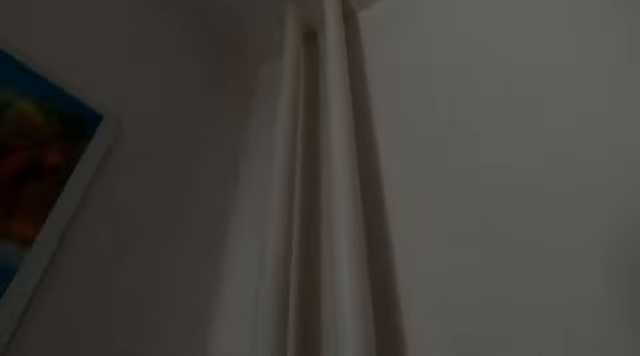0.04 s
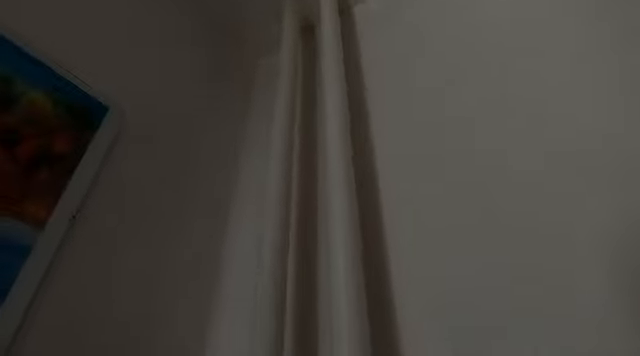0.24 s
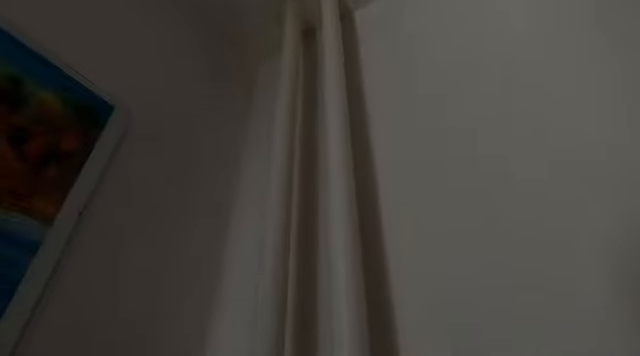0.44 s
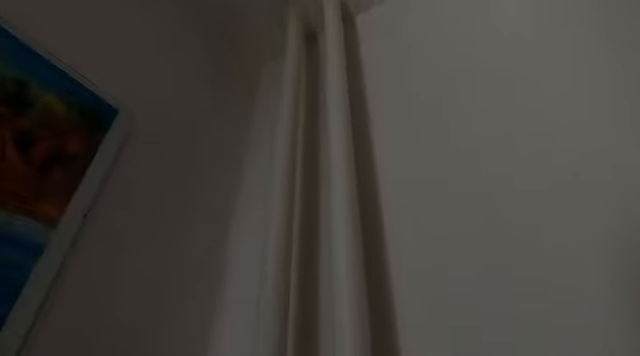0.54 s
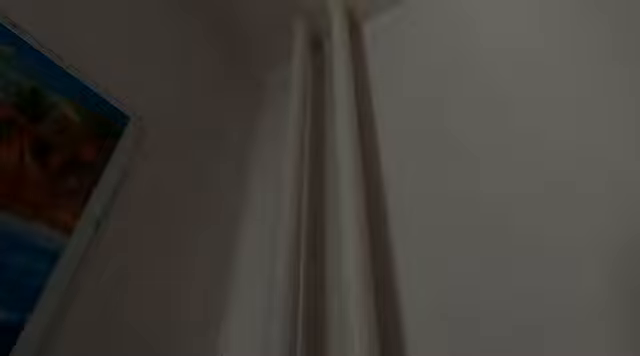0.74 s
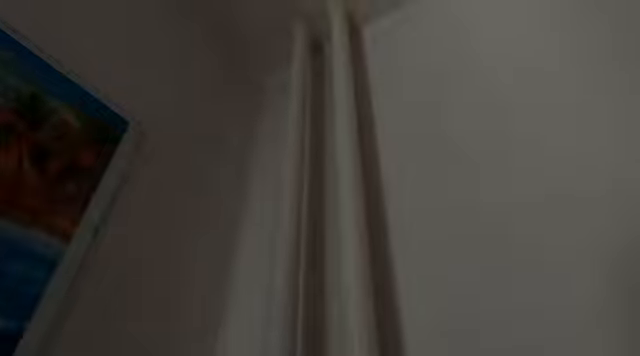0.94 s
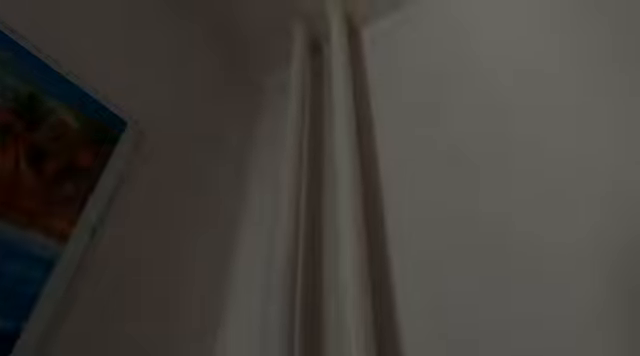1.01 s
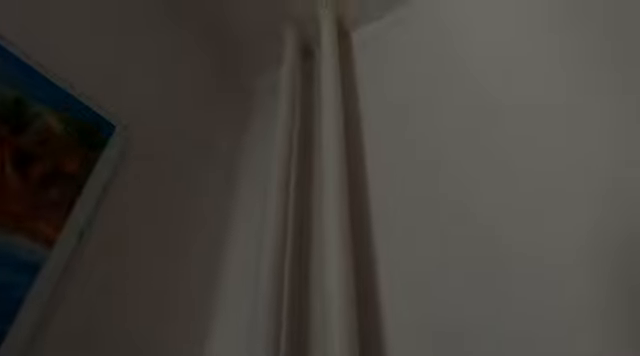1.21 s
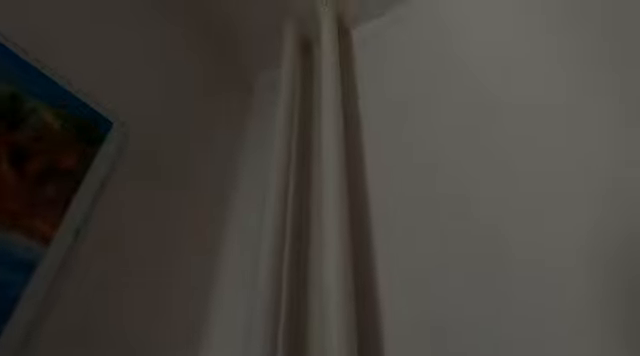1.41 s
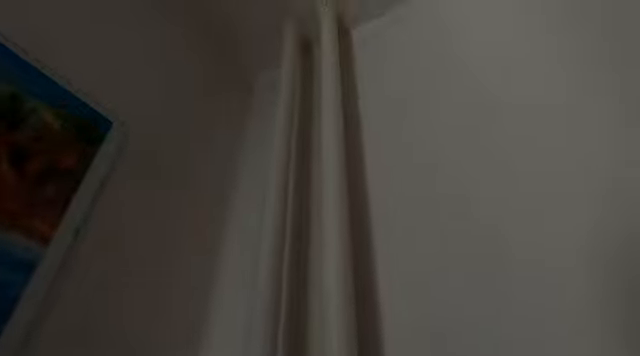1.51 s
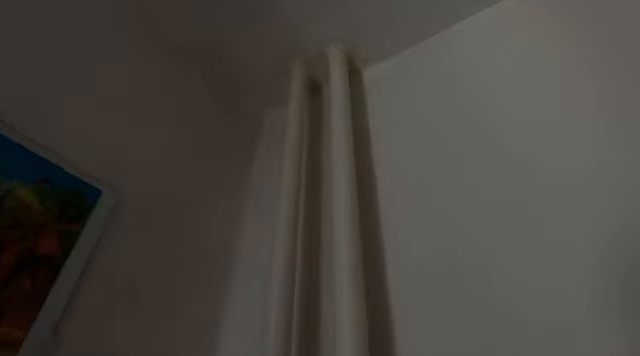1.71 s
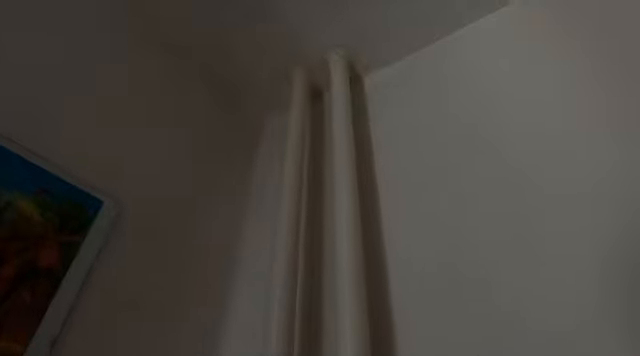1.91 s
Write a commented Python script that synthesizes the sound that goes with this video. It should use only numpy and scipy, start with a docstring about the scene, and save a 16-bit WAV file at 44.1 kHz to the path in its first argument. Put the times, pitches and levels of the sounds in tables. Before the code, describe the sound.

A heating pipe bangs in a quiet bedroom: a fading tail at the start, then a sharp crack with thin steel ring and low boom at 1 second. Faint hiss and low handling thumps pass by 0.4 seconds. Louder dull knocks and rubbing crowd the right microphone from 0.7 to 0.95, returning at 1.3. A faint drone lies underneath, and deep rumble swells before everything stops at 1.7.

```python
"""In a quiet bedroom a heating pipe slips in its bracket and bangs: a sharp crack, a thin steel ring
and a low boom in the wall. The tail of an earlier bang is heard at the very start.
Dull knocks and soft rubbing crowd the right microphone, probably from a hand on the camera, whose
movement also rumbles. Under it lie the room's low drone and, early on, a faint hiss.
All falls silent shortly before the end."""
import sys
import numpy as np
from scipy import signal
from scipy.fft import rfft, irfft, next_fast_len
from scipy.io import wavfile
from scipy.ndimage import uniform_filter1d

SR = 44100
rng = np.random.default_rng(int(sys.argv[2]) if len(sys.argv) > 2 else 0)


def to_wav(sig):
    """Store sig (one row per channel, or 1-D mono) as 16-bit WAV at the path in sys.argv[1].

    Samples outside -1..1 are clipped; the rate is SR.
    """
    pcm = np.clip(np.atleast_2d(sig), -1, 1) * 32767
    pcm = np.round(pcm).astype(np.int16)
    wavfile.write(sys.argv[1], SR, pcm.T)  # frames by channels


N = 85995
T = np.arange(N) / SR


def amp(db):
    """Turn decibels into a gain."""
    return 10 ** (np.asarray(db) / 20)


def unit(x):
    """Scale a signal to an average strength (rms) of 1."""
    return x / np.sqrt(np.mean(x ** 2) + 1e-20)


def along(points, hz):
    """Read between (frequency, value) points on a log frequency axis."""
    f, v = np.transpose(points)
    return np.interp(np.log(hz + 1), np.log(f + 1), v)


def filtered(x, response):
    """Scale each frequency in x by the gain response(hz)."""
    size = next_fast_len(N + 8192)
    return irfft(rfft(x, size) * response(np.fft.rfftfreq(size, 1 / SR)), size)[..., :N]


def noise(colour, alike):
    """Stereo noise of rms about 1; colour sets its bass-to-treble balance, alike=1 makes it mono."""
    mid, side = unit(filtered(rng.standard_normal((2, N)), lambda hz: amp(along(colour, hz))))
    turn = np.arccos(np.clip(alike, -1, 1)) / 2
    return np.cos(turn) * mid + np.sin(turn) * np.array([side, -side])


def wobble(speed_hz):
    """A random wiggle of rms 1, mostly slower than speed_hz."""
    return unit(filtered(rng.standard_normal(N), lambda hz: np.exp(-(hz / speed_hz) ** 2)))


def left(db):
    """Gains for both channels, the left one changed by db."""
    return np.array([[amp(db)], [1]])


def fade(s, rise, t60):
    """Rise smoothly from time s to a peak of 1, then die away by 60 dB every t60 seconds."""
    t = np.maximum(T - s, 0)
    shape = (1 - np.exp(-(t / rise) ** 2)) * np.exp(-np.log(1000) * t / t60)
    return shape / shape.max()


def ring(s, hz, rise, t60, sag=0, sag_s=0.0082):
    """A struck tone that dies away; its pitch drops by the share sag."""
    t = np.maximum(T - s, 0)
    cycles = hz * (t - sag * (t - sag_s * (1 - np.exp(-t / sag_s))))
    return fade(s, rise, t60) * np.sin(2 * np.pi * cycles)


# colour of the still room (f/Hz, level/dB)
QUIET_COLOUR = [(24, -17), (50, -1.5), (100, -4.5), (195, -7), (280, -13), (390, -7.5), (500, -15),
                (750, -19.5), (1120, -18), (1400, -22), (2200, -24.5), (4500, -32.5), (8000, -37.5),
                (10400, -55.5), (13500, -77)]
# colour of the room's low resonances (f/Hz, level/dB)
DRONE_COLOUR = [(60, -33), (125, -13.5), (150, 2), (195, 1.5), (225, -5.5), (300, -19.5), (800, -73)]


def room_tone():
    """The quiet room and its steady low drone."""
    return amp(-69) * noise(QUIET_COLOUR, alike=0.11) + amp(-68) * noise(DRONE_COLOUR, alike=0.76)


# how the hiss fades (t/s, level/dB)
HISS_LEVEL = [(0.0, -71.5), (0.03, -71.5), (0.201, -71.5), (0.338, -85), (0.451, -100)]
# colour of the hiss (f/Hz, level/dB)
HISS_COLOUR = [(300, -15), (1000, -7), (2600, -5.5), (4200, -0.5), (6500, -7.5), (8600, -6.5), (10000, -30),
               (12000, -69.5)]


def hiss():
    """A faint hiss that dies away early on."""
    level_db = np.interp(T, *np.transpose(HISS_LEVEL), right=-120)
    return amp(level_db) * left(db=4.5) * noise(HISS_COLOUR, alike=0.37)


# how the rumble and the sway swell (t/s, level/dB)
RUMBLE_LEVEL = [(0, -74), (.08, -53.5), (.205, -59), (.241, -40.5), (.31, -38.5), (.355, -43.5),
                (.395, -58), (.5, -59.5), (.57, -59.5), (.65, -54.5), (.7, -50), (.75, -64.5), (1.01, -70),
                (1.111, -52), (1.28, -68.5), (1.38, -57), (1.52, -73.5), (1.68, -73)]
SWAY_LEVEL = [(1.55, -71), (1.59, -39), (1.68, -33)]
# their colours (f/Hz, level/dB)
RUMBLE_COLOUR = [(5, -14.5), (18, 8), (30, -6), (55, -4), (80, -22.5), (130, -25.5), (250, -53), (600, -80),
                 (2000, -85)]
SWAY_COLOUR = [(5, -2), (15, 3), (35, -13), (55, -21.5), (80, -32.5), (130, -49.5), (300, -78),
               (2000, -130)]


def rumble():
    """Moving the microphones makes very low swells, and a deep sway on the right near the end."""
    swells = amp(np.interp(T, *np.transpose(RUMBLE_LEVEL))) * noise(RUMBLE_COLOUR, alike=0.9)
    sway = amp(np.interp(T, *np.transpose(SWAY_LEVEL))) * noise(SWAY_COLOUR, alike=0.95)
    return swells + left(db=-18.5) * sway


# soft bumps of the hand (t/s, f/Hz, level/dB)
THUMPS = [(0.217, 70.4, -46.5), (0.247, 74.4, -42.5), (.274, 100, -45.5), (.298, 82, -42.5),
          (.328, 83, -46), (0.361, 103, -54)]


def thumps():
    """The hand shifts its grip in a few soft, low thumps."""
    return sum(amp(db) * ring(s, hz, rise=0.004, t60=0.05) for s, hz, db in THUMPS)


def tick():
    """One faint, high tick near the end."""
    return amp(-64) * ring(s=1.67, hz=9500, rise=0.00017, t60=0.006)


# the tones in a squeak (multiple of the pitch, level/dB)
SQUEAK_TONES = [(1, 4), (2, -26), (5, -30)]


def squeak(pitch_hz=447, wander=0.031):
    """Rubbed surfaces stick and slip in quick turns, making an unsteady tone."""
    hz = pitch_hz * (1 + wander * wobble(speed_hz=70))
    phase = 2 * np.pi * np.cumsum(hz) / SR
    return unit(sum(amp(db) * np.sin(round(k) * phase) for k, db in SQUEAK_TONES))


# strokes of the hand (peak t/s, rise/s, fall/s, level/dB, rustle's left minus right/dB,
# squeak/dB and groan/dB relative to the level)
STROKES = [(0.23, 0.02, 0.014, -80, 0, 3, 20), (.555, 0.038, 0.033, -65.5, -5.5, 11, -25),
           (0.687, .012, 0.0073, -68, -4.5, 11, 7.5), (.717, .006, .028, -63, -3, -20, -10),
           (.785, 0.03, 0.035, -70, -2.5, 11, 18.5), (0.866, 0.052, .032, -62, -2.5, 2, 12),
           (1.339, 0.026, 0.025, -55.5, -2, -28, -8.5), (1.462, 0.097, 0.079, -63, -2.5, -15.5, -6),
           (1.686, .014, .025, -67, -7.5, -9.5, -1)]
# colours of the rustle, the low groan and the bright scrape (f/Hz, level/dB)
RUSTLE_COLOUR = [(150, -7), (450, -1), (680, -10.5), (1100, 3.5), (1650, -11), (2150, -5), (2550, -12.5),
                 (3000, -12), (4800, -14.5), (8300, -28.5), (9400, -36.5), (10300, -58), (12000, -72.5)]
GROAN_COLOUR = [(60, -35), (120, -18), (150, 1.5), (195, 0), (240, -15), (330, -13), (900, -77.5)]
SCRAPE_COLOUR = [(1000, -27.5), (3500, -6.5), (5200, 2), (6500, -23), (9000, -31), (11000, -53.5)]


def rubbing():
    """Strokes swell and fade with a grainy rustle; some squeak or groan, and one scrapes."""
    grain = amp(1.8 * unit(uniform_filter1d(rng.standard_normal(N), size=130)))
    rustle = unit(grain * noise(RUSTLE_COLOUR, alike=0.17))
    squeal = squeak()
    groan = noise(GROAN_COLOUR, alike=0.9)
    scrape_shape = np.exp(-((T - 0.711) / 0.0016) ** 2)
    out = amp(-55) * scrape_shape * left(db=-15) * noise(SCRAPE_COLOUR, alike=0.4)
    lopsided = 12  # squeak and groan lean this many times more dB to one side than the rustle
    for s, rise, fall, db, left_db, squeak_db, groan_db in STROKES:
        from_peak = (T - s) / np.where(T < s, rise, fall)
        swell = np.exp(-from_peak ** 2)
        grip = np.exp(-from_peak ** 4)  # it squeaks only while pressed hard
        voice = amp(squeak_db) * grip * squeal + amp(groan_db) * swell * groan
        out += amp(db) * (left(left_db) * swell * rustle + left(lopsided * left_db) * voice)
    return out


# colour of the dry slide (f/Hz, level/dB)
RASP_COLOUR = [(300, -44), (650, -18.5), (920, -4), (1400, 0), (1800, -5), (2700, -14.5), (3800, -37),
               (4700, -14), (6000, -19.5), (8800, -23), (10000, -53.5)]


def rasp(start_s=1.2904, end_s=1.34):
    """A short slide starts suddenly and grows until the last knock."""
    level_db = np.interp(T, [start_s, end_s], [-65, -51.5], left=-140, right=-140)
    swell = uniform_filter1d(amp(level_db), size=130)
    return swell * left(db=-8.5) * noise(RASP_COLOUR, alike=0.87)


# dull blows (t/s, f/Hz, level/dB, rise/s, t60/s, click/dB and thud/dB relative to the level)
KNOCKS = [(.6936, 491, -27, .001, 0.025, -27, -17.5), (0.6926, 872, -36, 0.0013, 0.019, -45, -19),
          (.694, 640, -37.5, .001, 0.044, -40, -19), (0.701, 219, -35, 0.0054, .07, -27, -16.5),
          (.734, 430, -43, .004, .05, -22, -17), (.756, 425, -47, .004, .045, -32.5, -17),
          (.783, 922, -52, 0.0026, 0.039, -15, -3.5), (0.8282, 472.4, -37, 0.0088, 0.03, -21.5, -21),
          (.8277, 1205, -43, .0025, 0.0056, -9.5, -20), (0.8798, 470, -40, 0.0028, 0.054, -18.5, -23),
          (0.9366, 898, -33.5, 0.0023, 0.0098, -58, -16), (1.3393, 343, -26, 0.0034, .052, -19, -21.5),
          (1.3404, 657, -42.5, 0.00075, 0.029, -28.5, -13.5),
          (1.3395, 904, -49.5, 0.0024, 0.045, -25.5, -16)]
# colours of a blow's thud and click (f/Hz, level/dB)
THUD_COLOUR = [(60, -1.5), (200, 14.5), (450, 8), (650, 8.5), (1000, 4.5), (1350, -28), (3000, -36.5),
               (9000, -61)]
CLICK_COLOUR = [(200, -12.5), (700, 18), (1150, 6.5), (1800, -4), (5000, -10.5), (8500, -14), (10500, -51)]
# tones of the knocked casing (f/Hz, level/dB relative to the knock, t60/s)
CASING_TONES = [(159, -32.5, .25), (407, -24.5, 0.12)]
KNOCK_LEFT_DB = -27.5


def knocks():
    """Soft blows by the right microphone: a hollow tone, a thud, a click and the casing's ring."""
    out = np.zeros((2, N))
    thud_noise, click_noise = noise(THUD_COLOUR, alike=0.58), noise(CLICK_COLOUR, alike=0.44)
    for s, hz, db, rise, t60, click_db, thud_db in KNOCKS:
        tone = ring(s, hz, rise, t60, sag=0.17)
        thud = amp(thud_db) * fade(s, rise=0.0036, t60=0.059) * thud_noise
        casing = sum(amp(level) * ring(s, f, 0.004, decay) for f, level, decay in CASING_TONES)
        click = amp(click_db) * fade(s, rise=0.00046, t60=0.022) * click_noise
        out += amp(db) * (left(KNOCK_LEFT_DB) * (tone + thud + casing) + left(db=-3.5) * click)
    return out


# taps just after the first knock (t/s, f/Hz, level/dB)
TAPS = [(.7135, 792, -38), (.7178, 938, -35), (.7275, 878, -38.5), (.7405, 867, -39), (.7515, 870, -42.5)]


def chatter():
    """Quick, uneven taps that die away, each a hollow tone and a thud."""
    out = np.zeros((2, N))
    thud_noise = noise(THUD_COLOUR, alike=0.75)
    for s, hz, db in TAPS:
        tone = ring(s, hz, rise=0.0021, t60=0.046)
        thud = amp(-11) * fade(s, rise=0.002, t60=0.035) * thud_noise
        out += amp(db) * (tone + thud)
    return left(KNOCK_LEFT_DB) * out


# how long sound lingers in the bedroom (f/Hz, t60/s)
ECHO_TIMES = [(150, 0.31), (400, .3), (1000, 0.26), (2800, 0.27), (8000, .19)]


def room_echo(x):
    """The bedroom's echo of a mono sound, dying faster in the treble."""
    hz, t, spectrum = signal.stft(rng.standard_normal((2, SR // 2)), SR, nperseg=256)
    decay = np.exp(-np.log(1000) * t / along(ECHO_TIMES, hz)[:, None])
    _, tail = signal.istft(spectrum * decay, SR, nperseg=256)
    tail = tail + tail[::-1] / 3  # each side hears some of the other
    return signal.fftconvolve(x[None], tail / np.linalg.norm(tail[0]), axes=1)[:, :N]


def snap(s, colour, size=2048):
    """One sharp pulse of the given colour at time s, with a peak of 1."""
    cepstrum = irfft(np.log(amp(along(colour, np.fft.rfftfreq(size, 1 / SR)))))
    # folding the second half onto the first packs the energy at the pulse's start
    cepstrum[1:size // 2] *= 2
    cepstrum[size // 2:] = 0
    pulse = irfft(np.exp(rfft(cepstrum)))
    return np.pad(pulse / abs(pulse).max(), (round(s * SR), N))[:N]


# tones of the pipe's bracket (f/Hz, relative level/dB, t60/s)
BRACKET_TONES = [(301.4, -9, .01), (1064, 4.5, 0.015), (1367, 0.5, 0.0074), (1980, -6, 0.025),
                 (3620, -5, .013), (4150, -7, .012), (5380, -13, 0.01)]


def bracket_clack():
    """The jolted bracket rings so briefly that it sounds like a clack."""
    return sum(amp(db) * ring(0.0012, hz, rise=0.00025, t60=t60) for hz, db, t60 in BRACKET_TONES)


# tones of the steel pipe (f/Hz, relative level/dB, t60/s)
STEEL_TONES = [(1027, -20, 0.33), (1340, -14.5, .22), (1564, -16, .15), (8300, -28, 0.31),
               (8670, -15.5, 0.11), (8800, -19, .13)]


def steel_ring(roughness=1.1):
    """The steel rings thinly, each tone roughened by a fast random flutter."""
    out = np.zeros(N)
    for hz, db, t60 in STEEL_TONES:
        flutter = 1 + roughness * wobble(speed_hz=130)
        out += amp(db) * ring(0, hz, rise=0.0005, t60=t60) * flutter
    return out


# pipe bangs, the first just before the start (t/s, level/dB)
BANGS = [(-.03, -45), (0.9694, -45)]
# colour of the crack and the bracket's buzz (f/Hz, level/dB)
CRACK_COLOUR = [(100, -22.5), (280, 4), (750, 0), (1100, -1), (1500, -2.5), (2100, -4.5), (3200, -9),
                (4500, -12), (5600, -15.5), (7000, -17.5), (8900, -11), (10000, -22), (12000, -36.5)]


def pipe():
    """The pipe slips in its bracket: a crack, a clack and a buzz, the steel's ring, the wall's boom."""
    out = np.zeros((2, N))
    for s, db in BANGS:
        spike = amp(6.5) * snap(0.0016, CRACK_COLOUR)
        crack = spike + amp(-0.5) * fade(0, rise=0.0018, t60=0.0081) * noise(CRACK_COLOUR, alike=0.6)
        buzz = amp(-14) * fade(0, rise=0.003, t60=0.06) * noise(CRACK_COLOUR, alike=0.39)
        boom = amp(1) * ring(s=0.0115, hz=206, rise=0.0077, t60=0.055)
        bang = crack + bracket_clack() + buzz + amp(-2) * steel_ring() + boom + amp(6) * room_echo(spike)
        since_bang = T - round(s * SR) / SR
        placed = np.array([np.interp(since_bang, T, side, left=0, right=0) for side in bang])
        out += amp(db) * left(db=1) * placed
    return out


def scene():
    """The pipe, the sounds of the hand and the room together."""
    events = pipe() + knocks() + chatter() + rubbing() + rasp() + tick()
    return events + hiss() + thumps() + rumble() + room_tone()


def record(dry, end_s=1.722, top_hz=11700):
    """The sound stops short at end_s, and the treble above top_hz is cut away."""
    gate = np.clip((end_s - T) / 0.003, 0, 1)
    return filtered(dry * gate, lambda hz: 1 / np.sqrt(1 + (hz / top_hz) ** 80))


dry = scene()
out = record(dry)
to_wav(out)
```